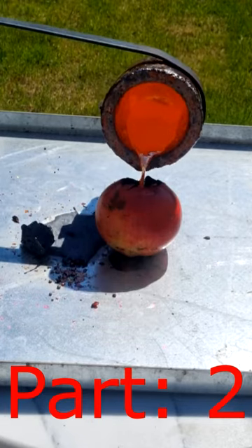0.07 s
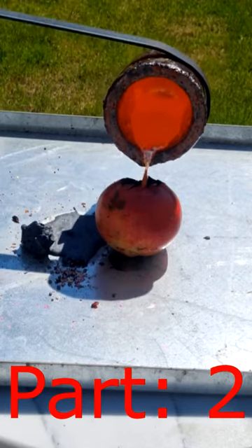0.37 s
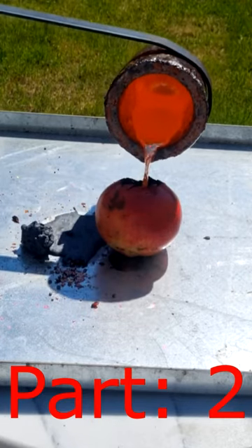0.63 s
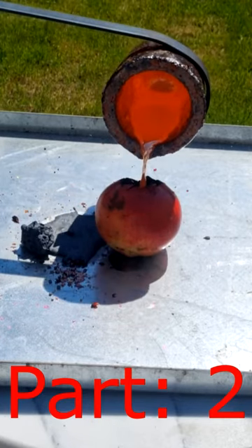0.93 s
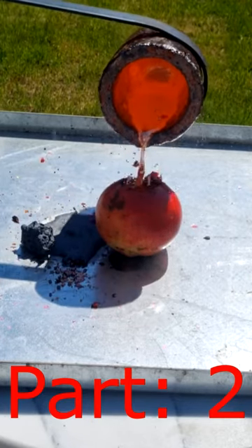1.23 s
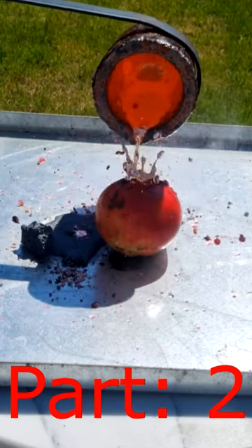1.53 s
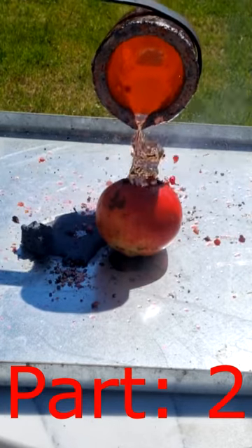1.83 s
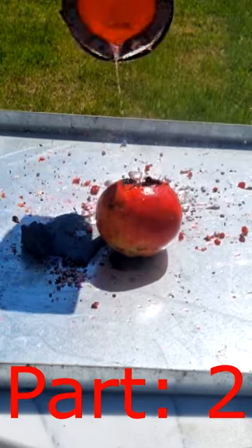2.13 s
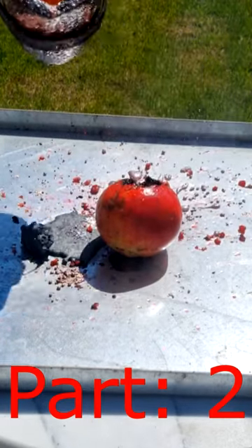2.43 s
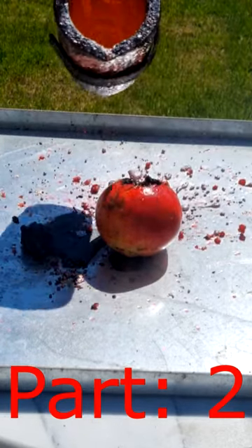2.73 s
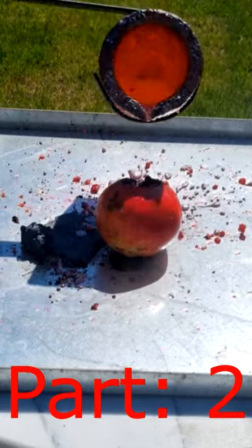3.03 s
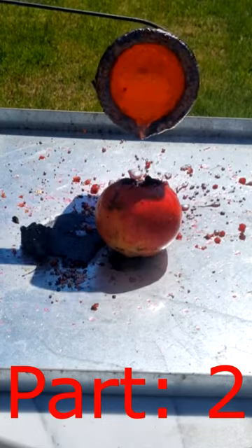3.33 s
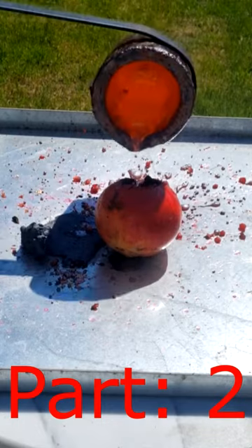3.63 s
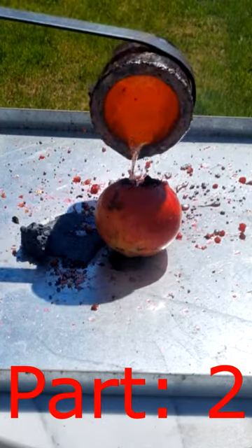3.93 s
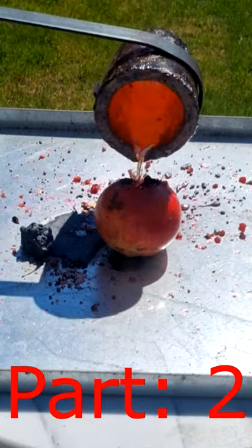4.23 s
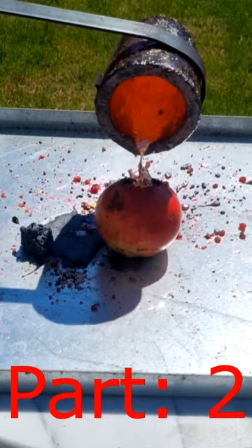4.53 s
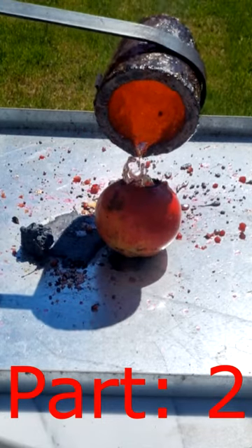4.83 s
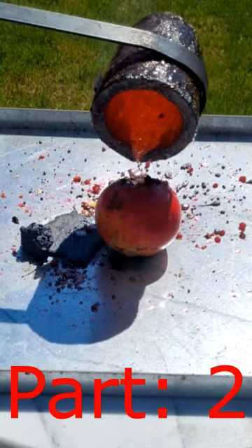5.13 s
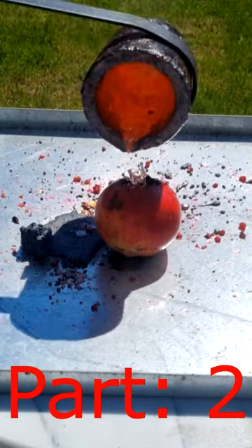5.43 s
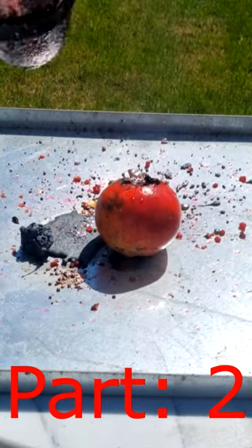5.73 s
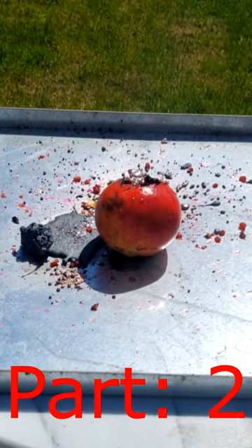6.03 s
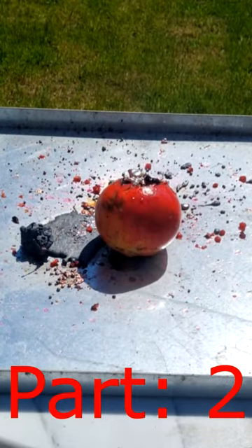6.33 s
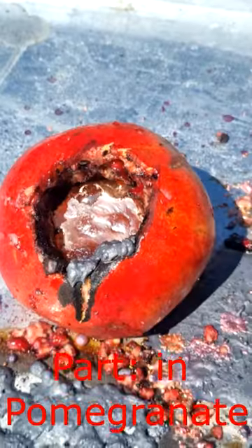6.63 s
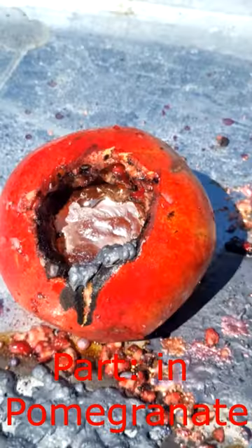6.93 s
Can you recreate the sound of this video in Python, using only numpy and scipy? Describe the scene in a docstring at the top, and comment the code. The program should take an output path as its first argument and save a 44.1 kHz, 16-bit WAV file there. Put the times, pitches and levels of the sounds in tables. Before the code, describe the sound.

Outdoors, wet fruit spits and pops as molten metal is poured into it. The crackle builds into a steamy hiss with bubbling juice, and spatter briefly rings a steel tray. Things settle to a simmer with small plops until a second, gentler pour brings more sizzling and a few thin ticks of metal beads. Finally the hiss falls away under a low gust on the microphone and a dry, crunchy rustle.

```python
"""A spitting crackle and sharp pops are heard first, as molten metal runs into a hollowed, juicy fruit
on a steel tray outdoors. Pockets of steam burst and excite the hollow's resonances until it fills;
juice boils and hisses, and one jet of steam throws metal on the tray, which rings. A second pour
revives the boiling. The hiss drops abruptly near the end, and wind buffets the microphone with a
dry rustle."""
import sys
import numpy as np
from scipy import signal
from scipy.fft import rfft, irfft
from scipy.io import wavfile
from scipy.ndimage import uniform_filter1d

SR = 44100
rng = np.random.default_rng(int(sys.argv[2]) if len(sys.argv) > 2 else 0)


def store_wav(level_fs):
    """Save 16-bit WAV to argv[1]."""
    pcm = np.round(np.clip(np.atleast_2d(level_fs), -1, 1) * 32767)
    wavfile.write(sys.argv[1], SR, pcm.T.astype(np.int16))


N = 312669
TIME = np.arange(N) / SR

# Event levels are relative: each source applies its own gain. A width is a Gaussian standard deviation.
# the loudest steam pockets bursting: t/s, level/dB, thump gain/dB, snap gain/dB
POPS = [(0.0532, -31.5, -30, -24), (0.114, -22, -29, -16), (0.1269, -30.5, -16, -7),
        (0.175, -33.5, -11, -12), (0.195, -30.5, -21, -18), (0.2143, -26, -27, -9),
        (0.2606, -18.5, -30, -6), (0.3163, -19, -13.5, -12), (0.3878, -20, -8, -6.5),
        (0.5125, -27.5, -29, -5), (0.5713, -22, -7, -6), (0.697, -26.5, -18, -5.5), (0.713, -32, -25, -9),
        (0.7446, -22, -18, -18), (0.81, -33.5, -6, -20), (0.953, -32.5, -10.5, -5), (1.053, -31, -4, -12),
        (1.0945, -31, -25, -4.5), (1.139, -30, -9, -16), (1.174, -30, -6, -6), (1.1783, -30.5, -1, -7),
        (1.222, -33, -4, 2), (1.312, -36, -2, 9), (1.3499, -26, -2, -4.5), (1.4176, -25, -5, -4),
        (1.4215, -25, -1.5, -6), (1.4649, -27, -2, -12), (1.4695, -21, -3.5, -5.5), (1.4739, -23, -1, -8),
        (1.5095, -25.5, -8, 0), (1.516, -26.5, -9, -2), (1.526, -30.5, 4, -7), (1.5685, -29, -1.5, -5),
        (1.602, -28.5, -5, -7), (1.6074, -25, -5, -13), (1.616, -29, 0, -8), (1.6423, -24, -3, -15),
        (1.779, -28, -28, -12), (1.805, -28, -13, -11), (1.8416, -34, -32, 3), (1.9273, -35, -3, 8),
        (2.249, -39.5, 7, -10), (2.291, -29.5, -8, -11), (2.417, -39.5, -9, 0), (2.4788, -43, 2, 0),
        (2.5794, -37, -25, 0.5), (3.5163, -28.5, -9, -8), (3.954, -32.5, -20, -22), (4.003, -26, -33, -17),
        (4.015, -33, -22, 3), (4.0189, -28.5, -18, 1), (4.0355, -32, -9, -12), (4.084, -35, -8, -10),
        (4.1613, -31.5, -8.5, -2), (4.2156, -37.5, -10, -12), (4.311, -32, -20, -13),
        (4.401, -34, -13, 3.5), (4.4365, -37.5, -2, -1), (4.594, -28, -30, -4), (4.6964, -36, -22, 2.5),
        (4.7003, -35.5, -13, 5), (4.733, -35.5, -3, -4), (4.9243, -37.5, -4, -10), (5.246, -23.5, -18, -2),
        (5.306, -38, -25, 1), (5.6064, -37, -6, -12), (6.1538, -30, -19, -5), (6.2848, -39, -17, -8),
        (6.8132, -33, -25, -1), (6.8376, -37.5, -5, -1), (6.9837, -40.5, 3.5, -16)]
# the stream striking the hollow's wall: t/s, duration/s, crackle level/dB, searing level/dB
SPITTING = [(-.03, 0.42, -38, -46), (.435, 0.21, -37.5, -38), (.66, 0.21, -41, -42.5),
            (.89, 0.32, -41.5, -42), (1.17, 0.71, -42.5, -57)]
# the two pours: full boil from t/s, until t/s, steam level/dB, simmer level/dB, churn level/dB
POURS = [(1.4, 1.84, -37.5, -44.5, -40), (4.484, 4.85, -43.5, -47.5, -55)]
# steam breaking out of the hollow: t/s, level gained/dB, rise time/s
BREAKOUTS = [(.88, 6.5, 0.017), (1.14, 4.5, 0.055)]
# fresh metal reaching wet flesh: t/s, level/dB, width/s
FLARES = [(1.406, -33, 0.014), (1.467, -25, 0.0066), (1.614, -30.5, 0.013), (4.01, -37.5, 0.051),
          (4.337, -34, 0.0085), (4.623, -37, 0.011), (1.91, -35, 0.014)]
# resonances of the gaps that steam escapes through: f/Hz, bandwidth/Hz, gain/dB
VENTS = [(1340, 140, -2), (2930, 380, .5), (3800, 1000, 1.5)]
# course of the hiss's resonance near 2 kHz: t/s, gain/dB
LOW_VENT_GAIN = [(1.8, 4), (2.2, -5), (2.85, 1.5), (3.3, 6), (3.8, 7.5), (4.2, 1), (5.3, -1), (6.2, -1)]
# big bubbles surfacing: t/s, peak level/dB, f/Hz
PLOPS = [(1.176, -25, 487), (2.248, -28, 680), (2.416, -31, 420), (2.4255, -34, 850), (2.479, -29, 480),
         (3.13, -32, 806), (3.191, -32.5, 413), (4.7322, -36.5, 480), (4.924, -34, 686), (5.021, -31, 806),
         (5.114, -32, 393), (5.423, -31.5, 830)]
# juice thrown out of the hollow: t/s, level/dB, width/s
SPLASHES = [(1.179, -33, 0.0053), (1.302, -32.5, .003), (1.46, -38.5, .03), (1.92, -36, 0.014),
            (3.32, -41, 0.0036), (5.264, -40.5, .005)]
# bending modes of the tray: f/Hz, level/dB, 60 dB decay time/s
TRAY_MODES = [(578, -9, 0.1), (852, -12, 0.12), (1370, -0.5, 0.071), (1850, -4.5, 0.14), (2130, 1, 0.11),
              (2350, -12, 0.14), (2660, -3, 0.081), (2990, 4.5, 0.054), (3580, 2, 0.053), (4660, -1, 0.046)]
# beads of metal striking the tray: t/s, level/dB, f/Hz
DROPLETS = [(0.114, -30, 9150), (.166, -42, 11500), (0.195, -40.5, 9500), (4.644, -35, 10300),
            (4.803, -39, 9500), (4.9015, -37.5, 10500), (4.958, -40, 8100)]
# the loudest crunches in the rustle: t/s, level/dB
CRUNCHES = [(6.631, -39), (6.664, -37), (6.713, -35.5), (6.957, -34.5), (7.053, -42)]
# gusts at the microphone: t/s, duration/s, buffet level/dB, flutter level/dB
GUSTS = [(5.1, 0.025, -46, -70), (5.46, 0.011, -48.5, -70), (6.527, 0.65, -34, -42),
         (6.635, 0.026, -38, -35), (6.74, 0.03, -32, -29), (6.77, 0.016, -28, -25),
         (6.98, 0.033, -30, -34.5)]

# spectra of a pop in the open and the full hollow, the fruit's thump, the metal's snap: f/Hz, level/dB
HOLLOW_POP = [(700, -18), (1250, -0.5), (1700, -15), (2100, 7), (2900, 6.5), (3350, 2.5), (3750, 1.5),
              (4600, -13.5), (6000, -21.5), (12000, -28.5)]
FULL_POP = [(600, -12.5), (1300, -8), (1800, -7.5), (2300, -2.5), (3050, 1.5), (3600, -1.5), (4100, -1.5),
            (4900, -15.5), (6000, -3.5), (12000, -35)]
THUMP = [(70, -36), (170, 2.5), (280, 8), (400, 1), (520, 9), (780, 6), (930, 4.5), (1200, 9), (1600, -1.5),
         (3000, -15)]
SNAP = [(2500, -26), (4800, 16), (7000, 16.5), (9000, 9.5), (12500, -3), (15200, -2.5)]
# spectra of crackle in the hollow, searing juice, escaping steam and its jet: f/Hz, level/dB
CRACKLE = [(300, -19.5), (750, -10.5), (1200, -9.5), (1720, -20), (2080, 2), (2450, -2.5), (2950, 4.5),
           (3350, -10.5), (3700, -3), (4400, -32), (7000, -14), (11000, -22)]
SEAR = [(2000, -29), (3650, 8.5), (4350, 2), (4750, 8), (5150, -5), (5600, 4.5), (6650, -7), (7150, -1),
        (8500, -38)]
STEAM = [(800, -11.5), (1800, -2.5), (2300, -2), (2750, 1), (3150, 2), (3600, -2), (4200, -0.1),
         (5200, 0.5), (7200, 1.5), (8800, 0.5), (10800, -4), (12500, -6), (14000, -4), (15400, -3.5)]
JET = [(200, -16), (600, 2.5), (1100, -5), (1500, 1.5), (2500, 2), (4700, .5), (7000, -2.5),
       (11000, -1), (15500, -9)]
# spectra of boiling, churning and splashing juice: f/Hz, level/dB
BOIL = [(60, -32), (130, -4.5), (220, -0.5), (380, -2), (520, 0), (780, 0), (950, -3.5), (1400, -3),
        (2200, -4), (4000, -1.5), (9000, -33)]
CHURN = [(60, -15), (90, 2), (140, -1.5), (220, -1), (300, 2.5), (380, -5.5), (490, 3.5), (620, -4),
         (760, 2.5), (920, -13.5), (1250, -3), (1650, -17), (2100, -0.5), (5000, -36)]
SPRAY = [(120, -14), (350, -3), (1100, -2.5), (1800, -6), (6000, -33)]
# spectra of the rustle, strong gusts, light gusts, their flutter and distant rumble: f/Hz, level/dB
RUSTLE = [(400, -6), (800, 6), (1400, .5), (2700, 4.5), (3700, -1.5), (5000, -10), (12000, -29),
          (15500, -12)]
BUFFET = [(20, -42), (45, 2), (75, 5.5), (170, 6), (270, -3), (380, -23), (500, -14), (750, -32),
          (1100, -43), (3000, -52), (8000, -60)]
BREEZE = [(20, -12), (40, -9), (70, 3), (110, -4), (200, -18), (800, -34)]
FLUTTER = [(80, -28), (190, 2.5), (300, 4.5), (420, 3.5), (510, 6), (620, -1), (750, -5.5), (1100, -17),
           (2800, -33), (7000, -53)]
RUMBLE = [(20, -25), (45, -14), (62, 4.5), (80, 5.5), (105, 7.5), (150, -13.5), (250, -13), (600, -22.5),
          (2000, -23), (8000, -40)]
# frequency response of the right microphone port: f/Hz, gain/dB
RIGHT_PORT = [(100, -3), (1500, -1), (2100, -5.5), (4000, -1), (7000, 1), (8000, 1.5), (9300, -25),
              (10700, -0.5), (12200, -15), (14200, 0.5), (15500, 1)]

FULL_S = 1.76  # the hollow is full of metal from here on
RING_SCATTER, RING_SAG_PER_S = .032, .029  # pops differ in pitch and sink until the hollow is full
HEAT_DB_PER_S, COOL_DB_PER_S = 10.5, 6.5
CHURN_RISE_DB_PER_S, CHURN_DECAY_S = 12.5, .14
LINGER_STEAM_DB, LINGER_JUICE_DB = -51.5, -55.5  # stored heat keeps the fruit simmering
SQUIRT_S, TRAY_HIT_S = 1.7138, 1.7205
HISS_DROP_S, HISS_DROP_FADE_S, HISS_DROP_DB = 6.49, .11, -6  # the hiss drops abruptly near the end


def pops():
    """Impulse response: a bursting pocket rings the hollow, thumps the fruit, snaps the metal's skin."""
    t = np.arange(SR // 40) / SR
    envelope = (np.exp(-t / .0017) + .045 * np.exp(-t / .008)) * (1 - np.exp(-t / .0004))
    out = np.zeros((2, N))
    for s, db, thump_db, snap_db in POPS:
        spectrum, splutter = (HOLLOW_POP, .42) if s < FULL_S else (FULL_POP, .3)
        share = np.clip(splutter * undb(.25 * thump_db), .05, .65)  # wet, thumping pops splutter more
        common, *own = rng.standard_normal((3, len(t)))
        burst = np.sqrt(share / len(t)) * unit((common + .5 * np.array(own)) * envelope)
        burst[:, 0] += np.sqrt(1 - share)  # the remaining energy is the opening click
        burst *= undb(db) * np.sqrt(.0052 * SR)
        pitch = 1 + RING_SCATTER * rng.uniform(-1, 1) - RING_SAG_PER_S * (min(s, FULL_S) - .5)
        ring = undb(2.2) * colour(burst, np.multiply(spectrum, [pitch, 1]))
        thump = undb(thump_db + 1) * colour(burst, np.multiply(THUMP, [pitch, 1]))
        snap = undb(snap_db + 2.5) * colour(burst * np.exp(-t / .003), SNAP)
        start = int(s * SR)
        sound = (ring + thump + snap)[:, :N - start]
        out[:, start:start + sound.shape[1]] += sound
    return out


def small_pops(simmer):
    """Poisson process: lesser pockets burst at random, as strongly as the juice boils."""
    bursts = scatter(grains(rate=45, spread_db=1.5), smear_s=.0021, share=.16, above_hz=5200) * simmer
    ring = undb(-5.5) * colour(bursts, FULL_POP)
    return ring + undb(-10) * colour(bursts, THUMP) + undb(-8.5) * colour(bursts, SNAP)


def spitting():
    """Flash boiling: juice crackles under the stream, filtered by the hollow, and sears on its wall."""
    crackle = scatter(grains(rate=3000, spread_db=5), smear_s=.0023, share=.52, above_hz=1800)
    sear = scatter(grains(rate=1100, spread_db=6), smear_s=.0027, share=.94, above_hz=2000)
    flicker = undb(2.5 + 1.5 * walk(160))
    crackle *= bouts(SPITTING, column=2, attack_s=.012, release_s=.049) * flicker
    sear *= bouts(SPITTING, column=3, attack_s=.021, release_s=.049)
    return colour(crackle, CRACKLE) + colour(sear, SEAR)


def steam(vapour):
    """Shot noise: tiny bursts merge into a hiss through resonant gaps, with flares and larger ticks."""
    fizz = scatter(grains(rate=7000, spread_db=3.4), smear_s=.0015, share=.65, above_hz=3500)
    sputter = undb(5.5 + .4 * walk(30) + .7 * walk(250))
    hiss = colour(fizz * vapour * sputter, STEAM)
    for hz, width_hz, db in VENTS:
        hiss = vent(hiss, hz, width_hz, db + 2.04 * walk(4.82))
    hiss = vent(hiss, hz=2170, width_hz=450, db=np.interp(TIME, *np.transpose(LOW_VENT_GAIN)))
    flare = scatter(grains(rate=2500, spread_db=3), smear_s=.002, share=.6, above_hz=4000)
    flare *= swells(FLARES)
    ticks = scatter(grains(rate=110, spread_db=3), smear_s=.0015, share=.6, above_hz=2500) * vapour
    ring = colour(flare + undb(-9) * ticks, FULL_POP)
    snap = colour(undb(-2) * flare + undb(-16) * ticks, SNAP)
    return hiss + ring + snap


def vent(x, hz, width_hz, db):
    """Resonance: a gap lifts or lowers one band, whose centre drifts as the metal heaves."""
    centre_hz = hz * (1 + .027 * walk(4.1))
    return x + (undb(db) - 1) * bandpass(x, centre_hz, width_hz)


def heating():
    """Heat transfer: the gains of steam, simmer and churning rise with each pour and decay after it."""
    steam_power, juice_power, churn = undb(LINGER_STEAM_DB) ** 2, undb(LINGER_JUICE_DB) ** 2, 0
    for full, until, steam_db, juice_db, churn_db in POURS:
        before, after = np.maximum(full - TIME, 0), np.maximum(TIME - until, 0)
        heat_db = -HEAT_DB_PER_S * before - COOL_DB_PER_S * after
        steam_power += undb(steam_db + heat_db) ** 2
        juice_power += undb(juice_db + heat_db) ** 2
        churn += undb(churn_db - CHURN_RISE_DB_PER_S * before) * np.exp(-after / CHURN_DECAY_S)
    trapped_db = sum(db * (1 - ramp(s, rise)) for s, db, rise in BREAKOUTS)
    drop_db = HISS_DROP_DB * ramp(HISS_DROP_S, HISS_DROP_FADE_S)
    vapour = np.sqrt(steam_power) * undb(drop_db - trapped_db)
    return vapour, np.sqrt(juice_power), churn


def boiling(simmer, bubbles_per_s=30, low_hz=346, high_hz=1240):
    """Nucleate boiling: dull blips and small ringing bubbles; big ones plop with a wet splat."""
    blips = undb(-4.5) * grains(rate=160, spread_db=4) + undb(-.04) * grains(rate=1500, spread_db=.5)
    splats = scatter(blips, smear_s=.0034, share=.61, above_hz=850) * simmer
    rings = np.zeros(N)
    t = np.arange(SR // 20) / SR
    for s, db, hz in PLOPS:
        span = slice(int(s * SR), int(s * SR) + len(t))
        rings[span] += undb(db) * bubble(hz, t)
        splats[:, span] += undb(db - 8) * rng.standard_normal(len(t)) * np.exp(-t / .005)
    for when, pitch, strength in rng.random((int(bubbles_per_s * N / SR), 3)):
        start = int(when * (N - len(t)))
        hz = low_hz * (high_hz / low_hz) ** pitch
        rings[start:start + len(t)] += undb(4.5) * strength * simmer[start] * bubble(hz, t)
    return undb(2.5) * colour(splats, BOIL) + rings


def bubble(hz, t, swell_cycles=.5):
    """Damped oscillation: the tone swells, rises as the bubble opens and dies within a few cycles."""
    cycles = hz * t * (1 + 5 * t)
    age = cycles / swell_cycles
    return np.sin(2 * np.pi * cycles) * age * np.exp(1 - age)


def churning(churn):
    """Two-phase flow: steam forces its way up through the juice in thick, low gulps."""
    gulps = scatter(grains(rate=280, spread_db=3.5), smear_s=.0058, share=.54, above_hz=500)
    return colour(gulps * churn, CHURN)


def squirt():
    """Jet noise: trapped steam blows out in one short, rough puff."""
    age = np.maximum(TIME - SQUIRT_S, 0)
    jet = scatter(grains(rate=12000, spread_db=2.5), smear_s=.002, share=.7, above_hz=4500)
    envelope = (1 - np.exp(-age / .0012)) * np.exp(-age / .0086)
    return undb(-9) * colour(jet * envelope, JET)


def tray():
    """Modal vibration: metal thrown by the jet sets the steel sheet ringing."""
    age = np.maximum(TIME - TRAY_HIT_S, 0)
    ring = np.zeros((2, N))
    for hz, db, t60 in TRAY_MODES:
        port_phase = rng.normal(0, .5, (2, 1))
        ring += undb(db - 60 * age / t60) * np.sin(2 * np.pi * hz * age + port_phase)
    return undb(-19) * ring * (1 - np.exp(-age / .0021))


def droplets():
    """Impact noise: the brief contact of a metal bead with the tray gives a thin, bright tick."""
    t = np.arange(SR // 100) / SR
    out = np.zeros((2, N))
    for s, db, hz in DROPLETS:
        start = int(s * SR)
        contacts = rng.standard_normal((2, len(t))) * np.exp(-t / .0011)
        for port, contact in zip(out, contacts):
            tick = bandpass(contact, np.full(len(t), hz), width_hz=3700)
            port[start:start + len(t)] += undb(db) * unit(tick)
    return out


def splashes():
    """Superposition: many wet blips add up to a spray of thrown juice."""
    spray = scatter(grains(rate=1500, spread_db=2.5), smear_s=.002, share=.5, above_hz=1500)
    return colour(spray * swells(SPLASHES), SPRAY)


def rustle(start_s=6.61, length_s=.45, level_db=-42.5):
    """Impulsive noise: random clicks and a few louder crunches make a close, dry rustle."""
    clicks = scatter(grains(rate=380, spread_db=1.5), smear_s=.0027, share=.92, above_hz=650)
    clicks *= bouts([(start_s, length_s, level_db)], column=2, attack_s=.0064, release_s=.029)
    crunches = rng.standard_normal((2, N)) * swells((s, db, .0039) for s, db in CRUNCHES)
    return colour(clicks + crunches, RUSTLE)


def wind(strong_gust_db=-37):
    """Turbulent pressure: eddies rumble or buffet, mainly at the left port; late gusts flutter at both."""
    gust = bouts(GUSTS, column=2, attack_s=.0037, release_s=.026)
    strength = np.minimum(gust / undb(strong_gust_db), 1)
    eddies = rng.standard_normal((2, N)) * gust * undb(1 + walk(60)) * undb([[1.5], [-7]])
    flutter = rng.standard_normal((2, N)) * undb(2.5 * walk(150)) * ramp(start_s=6.56, rise_s=.067)
    flutter *= bouts(GUSTS, column=3, attack_s=.0037, release_s=.029) * undb([[-.5], [2]])
    buffet = colour(eddies * strength, BUFFET)
    breeze = colour(eddies * (1 - strength) * undb(9), BREEZE)
    return buffet + breeze + colour(flutter, FLUTTER)


def distant_rumble():
    """Ambient noise: a steady low rumble, partly coherent between the two ports."""
    common, *own = rng.standard_normal((3, N))
    return undb(-56.5) * colour(common + .79 * np.array(own), RUMBLE)


def grains(rate, spread_db):
    """Poisson impulses, rate per second, most of them small and a few large; unit rms."""
    chance, size, sign = rng.random(N), rng.exponential(size=N), rng.choice([-1, 1], N)
    return unit((chance < rate / SR) * sign * undb(spread_db * np.minimum(size, 4)))


def scatter(x, smear_s, share, above_hz):
    """Diffuse reflection: a share of the treble energy comes off the tray, smeared and incoherent."""
    fade = np.exp(-1 / (smear_s * SR))
    energy = signal.lfilter([1 - fade], [1, -fade], x ** 2)
    smear = np.sqrt(energy) * rng.standard_normal((2, N))
    lowpass = signal.butter(1, above_hz, fs=SR)
    low = signal.lfilter(*lowpass, x)
    diffuse = smear - signal.lfilter(*lowpass, smear)
    return low + np.sqrt(1 - share) * (x - low) + np.sqrt(share) * diffuse


def colour(x, points, keep_power=True, size=2048):
    """Minimum-phase filter through (f/Hz, level/dB) points; by default white noise keeps its power."""
    hz, db = np.transpose(points)
    log_hz = np.log(np.fft.rfftfreq(size, 1 / SR) + 1)
    cepstrum = irfft(np.log(undb(np.interp(log_hz, np.log(hz), db))))
    cepstrum[1:size // 2] *= 2  # folding onto positive time makes the filter causal
    cepstrum[size // 2 + 1:] = 0
    response = irfft(np.exp(rfft(cepstrum)))
    if keep_power:
        response /= np.linalg.norm(response)
    return signal.oaconvolve(x, response[None], axes=-1)[:, :N]


def bandpass(x, hz, width_hz):
    """Heterodyne band-pass with a movable centre: shift down, smooth, shift back."""
    carrier = np.exp(2j * np.pi * np.cumsum(hz) / SR)
    pole = np.exp(-np.pi * width_hz / SR)
    return 2 * np.real(signal.lfilter([1 - pole], [1, -pole], x * carrier.conj()) * carrier)


def walk(rate):
    """Random modulation: rate levels per second, smoothed twice; unit rms."""
    hold = int(SR / rate)
    steps = np.repeat(rng.standard_normal(N // hold + 1), hold)
    return unit(uniform_filter1d(uniform_filter1d(steps, hold), hold)[:N])


def bouts(rows, column, attack_s, release_s):
    """Incoherent sum: gain of (t/s, duration/s, ...) events, with level/dB in the given column."""
    power = 0
    for row in rows:
        after = np.maximum(TIME - row[0] - row[1], 0)
        power += (undb(row[column]) * ramp(row[0], attack_s) * np.exp(-after / release_s)) ** 2
    return np.sqrt(power)


def swells(rows):
    """Gaussian envelopes: gain of (t/s, level/dB, width/s) events."""
    return sum(undb(db) * np.exp(-.5 * ((TIME - s) / width) ** 2) for s, db, width in rows)


def ramp(start_s, rise_s):
    """Linear rise from zero to one."""
    return np.clip((TIME - start_s) / rise_s, 0, 1)


def undb(db):
    """Decibels to amplitude ratio."""
    return 10 ** (np.asarray(db) / 20)


def unit(x):
    """Normalisation to unit rms."""
    return x / np.sqrt(np.mean(x ** 2))


def arrive(x, lag_samples):
    """Propagation delay: sound reaches the right port later."""
    return np.array([x[0], np.pad(x[1], (lag_samples, 0))[:N]])


def scene():
    """Localisation by arrival time: the fruit lies slightly left, so the left port hears it first."""
    vapour, simmer, churn = heating()
    bursts = pops() + small_pops(simmer) + spitting() + squirt() + tray() + droplets()
    sizzle = steam(vapour) + boiling(simmer) + churning(churn) + splashes()
    fruit = arrive(bursts, lag_samples=2) + arrive(sizzle, lag_samples=1)
    return fruit + rustle() + distant_rumble() + wind()


def record(dry):
    """Microphone response: two deep treble notches at the right port, and a steep low-pass on both."""
    ports = np.vstack([dry[:1], colour(dry[1:], RIGHT_PORT, keep_power=False)])
    cutoff_hz = 15950
    return signal.sosfilt(signal.ellip(10, .2, 70, cutoff_hz, fs=SR, output="sos"), ports)


dry = scene()
out = record(dry)
store_wav(out)
```